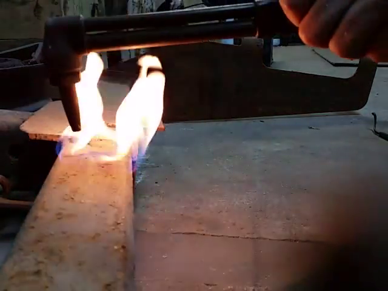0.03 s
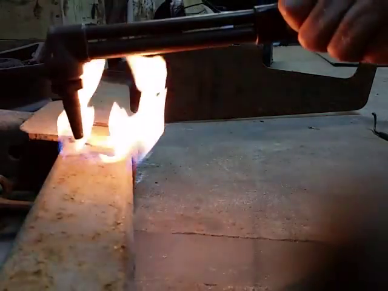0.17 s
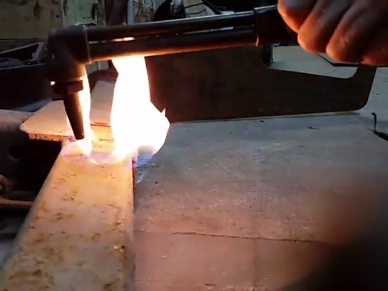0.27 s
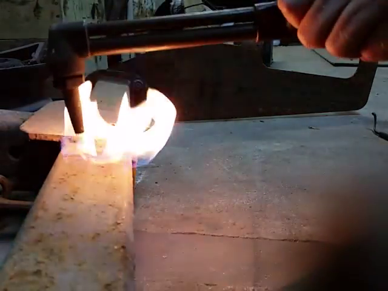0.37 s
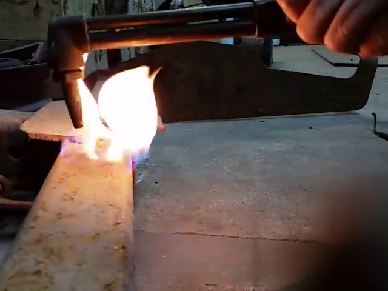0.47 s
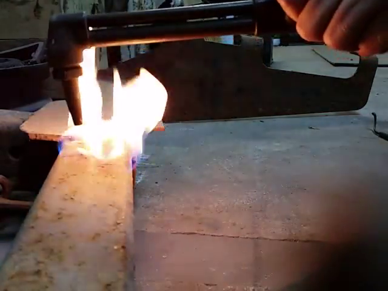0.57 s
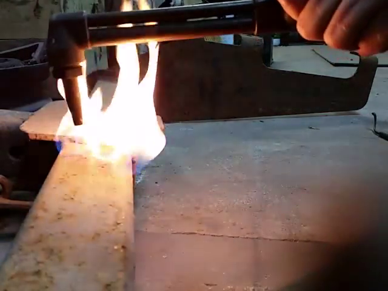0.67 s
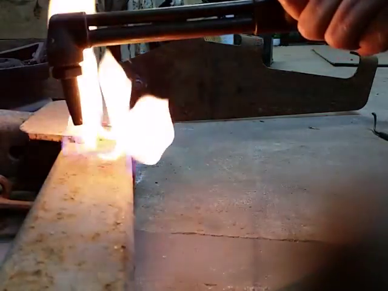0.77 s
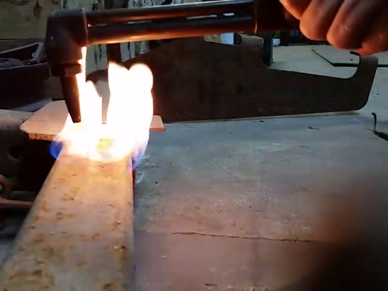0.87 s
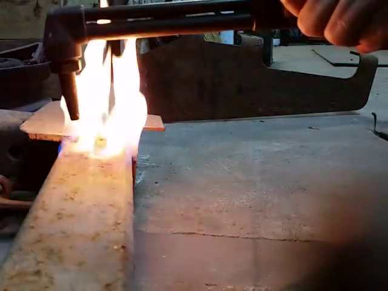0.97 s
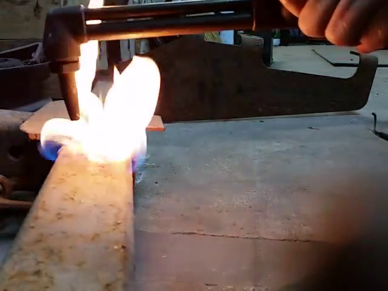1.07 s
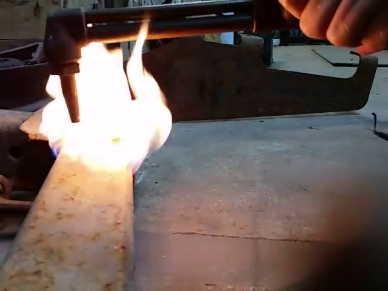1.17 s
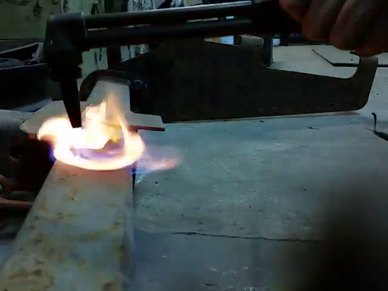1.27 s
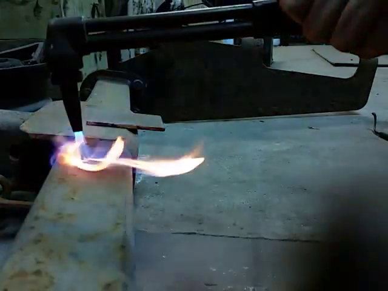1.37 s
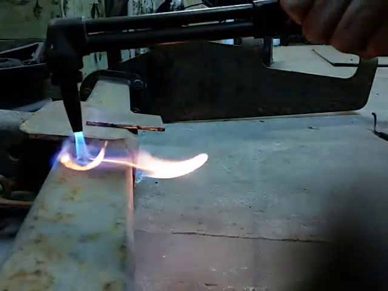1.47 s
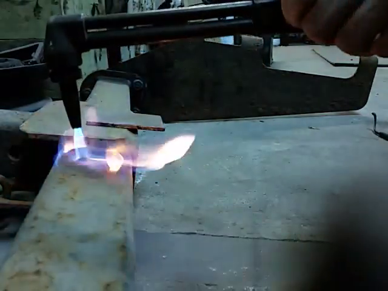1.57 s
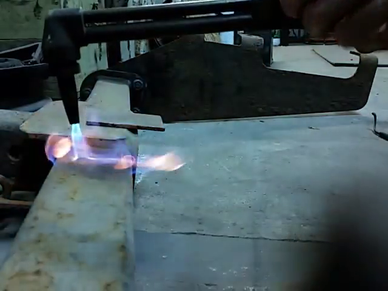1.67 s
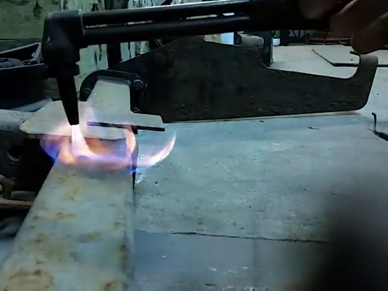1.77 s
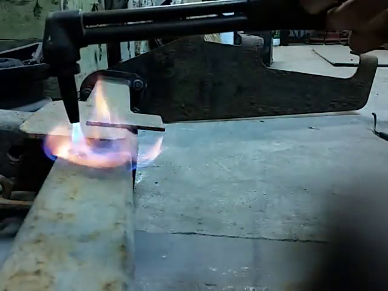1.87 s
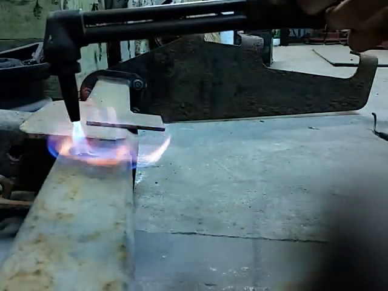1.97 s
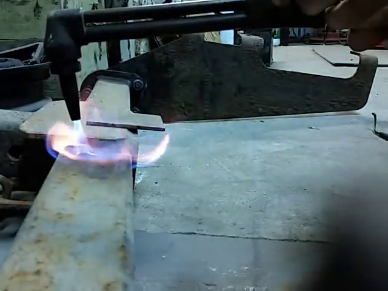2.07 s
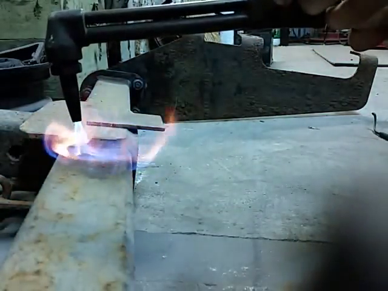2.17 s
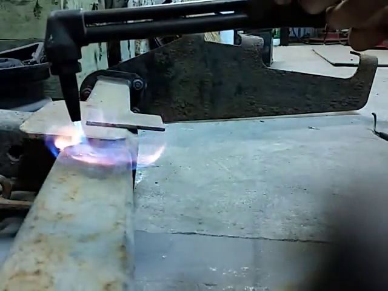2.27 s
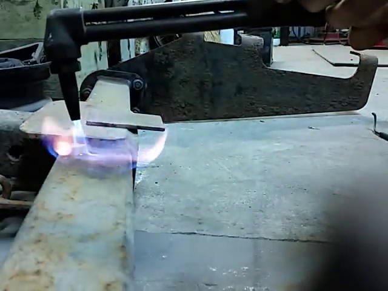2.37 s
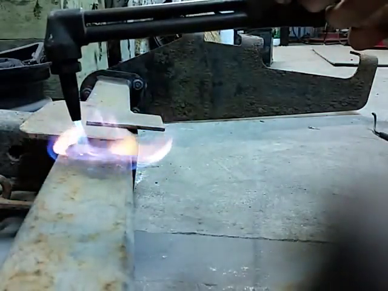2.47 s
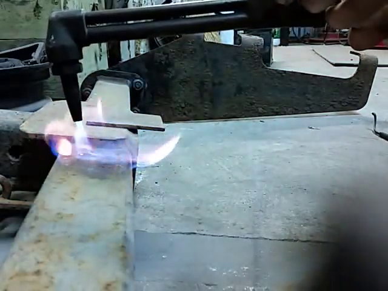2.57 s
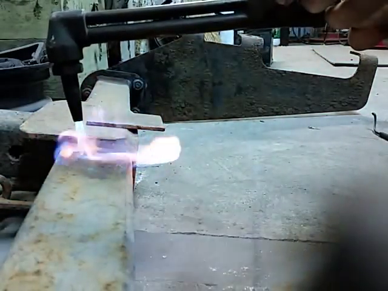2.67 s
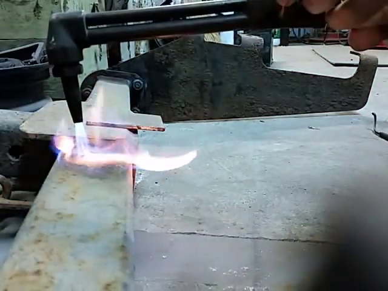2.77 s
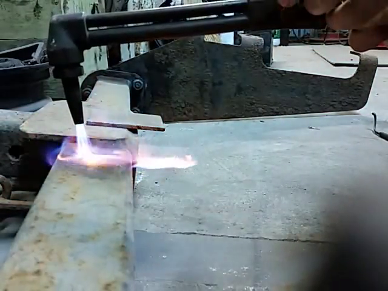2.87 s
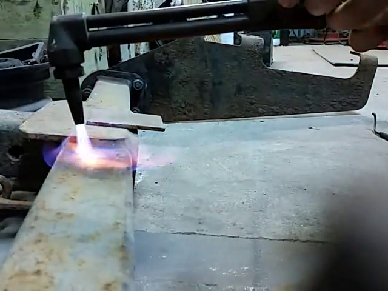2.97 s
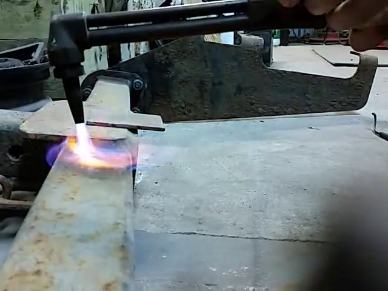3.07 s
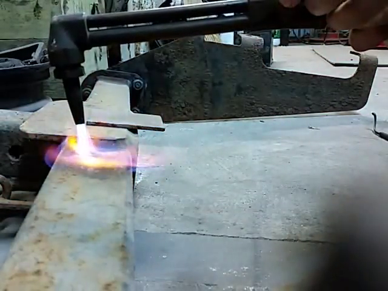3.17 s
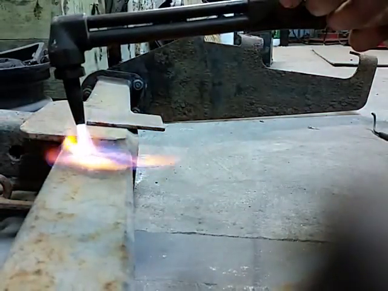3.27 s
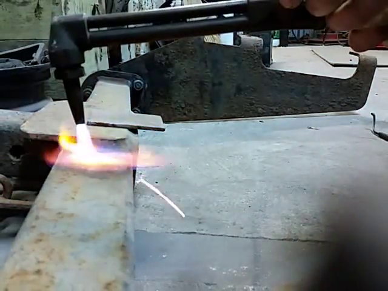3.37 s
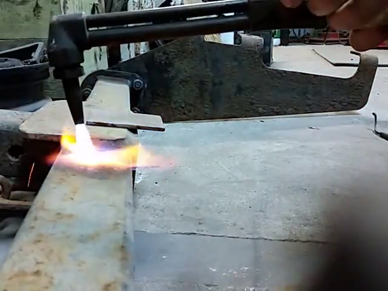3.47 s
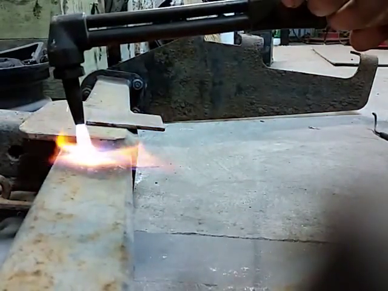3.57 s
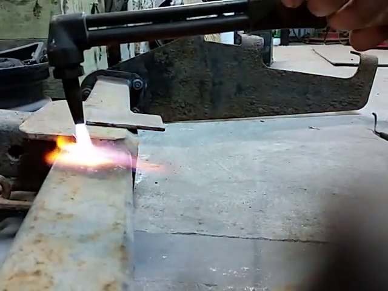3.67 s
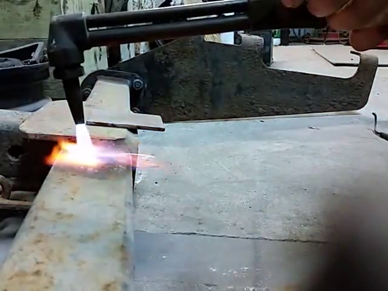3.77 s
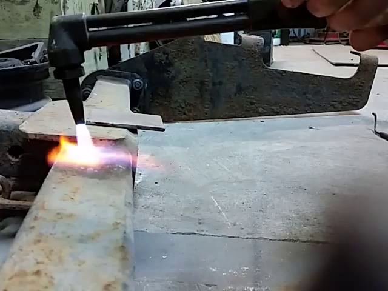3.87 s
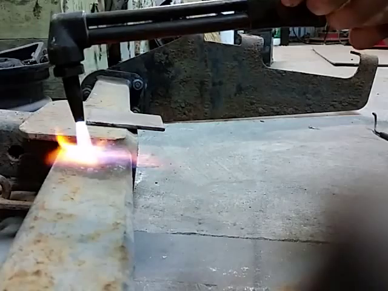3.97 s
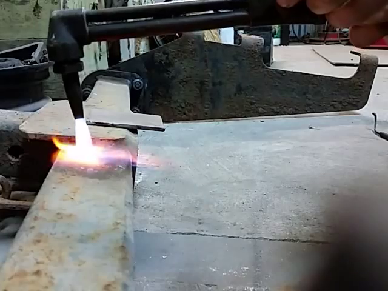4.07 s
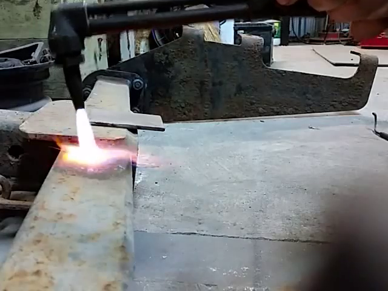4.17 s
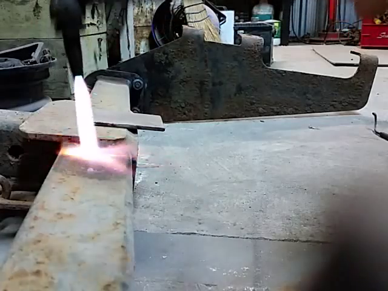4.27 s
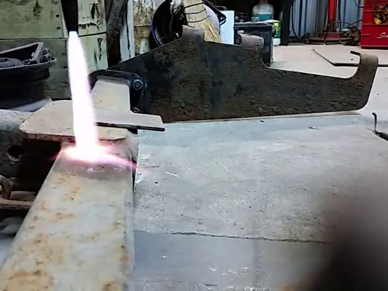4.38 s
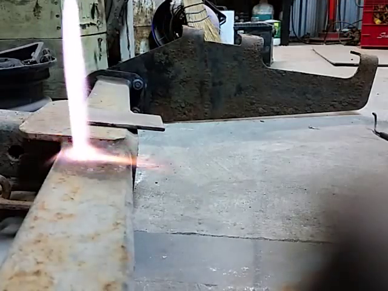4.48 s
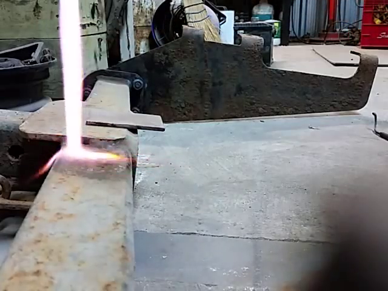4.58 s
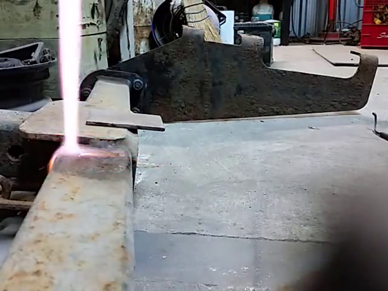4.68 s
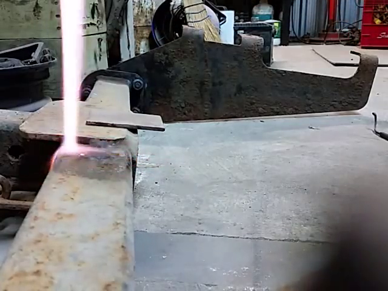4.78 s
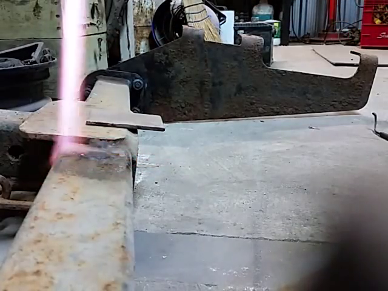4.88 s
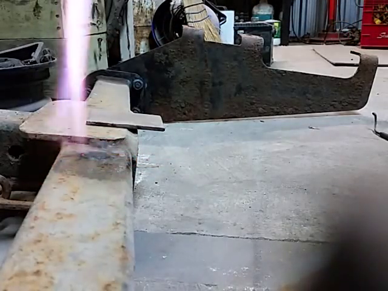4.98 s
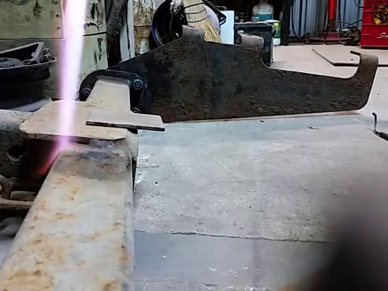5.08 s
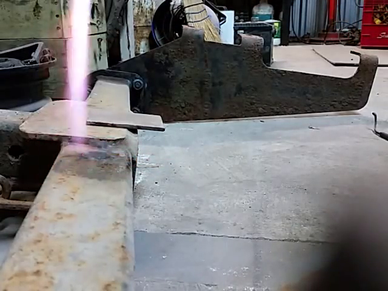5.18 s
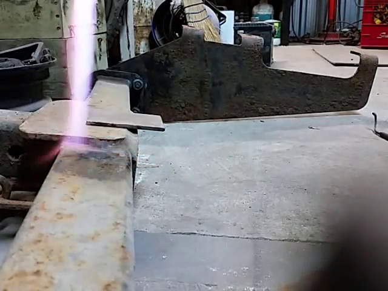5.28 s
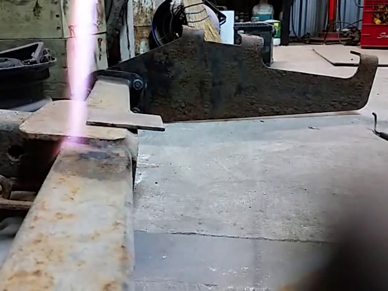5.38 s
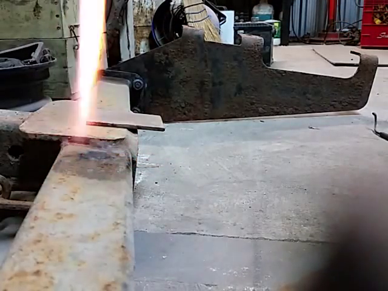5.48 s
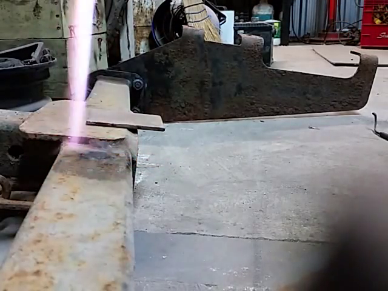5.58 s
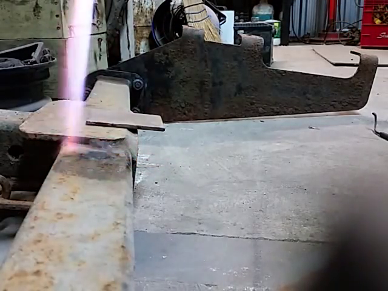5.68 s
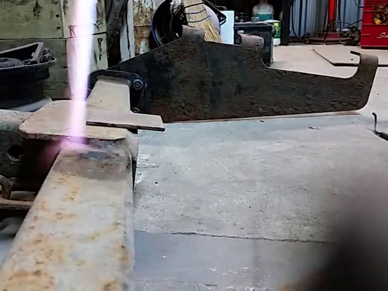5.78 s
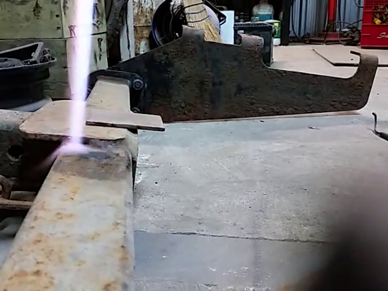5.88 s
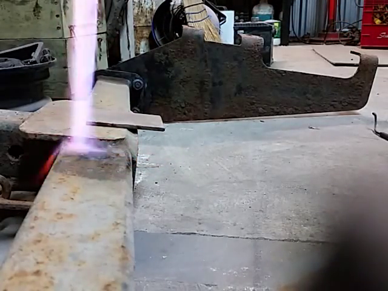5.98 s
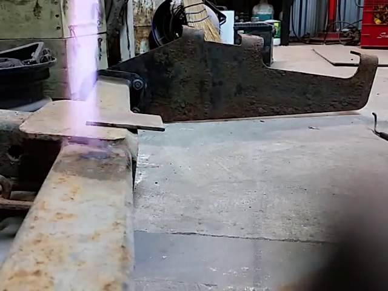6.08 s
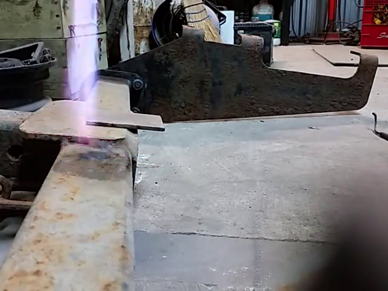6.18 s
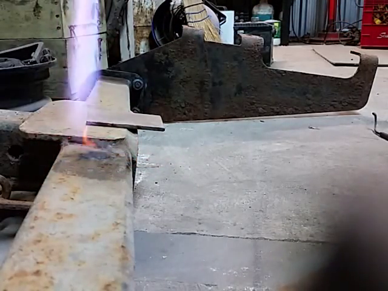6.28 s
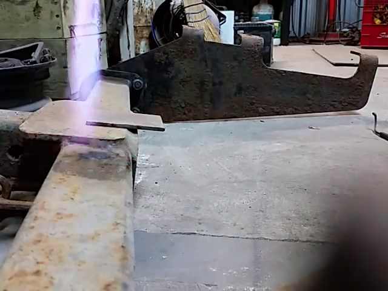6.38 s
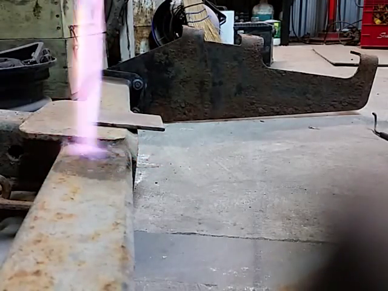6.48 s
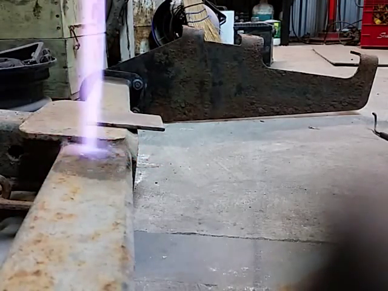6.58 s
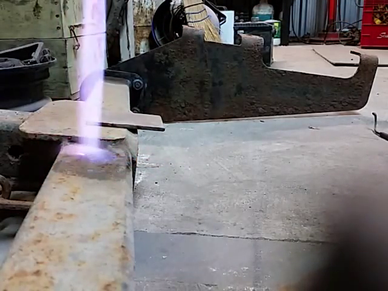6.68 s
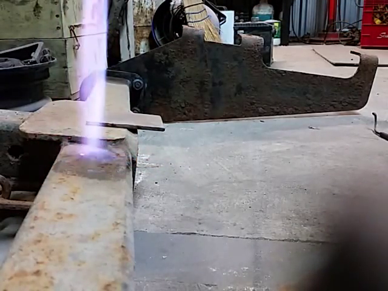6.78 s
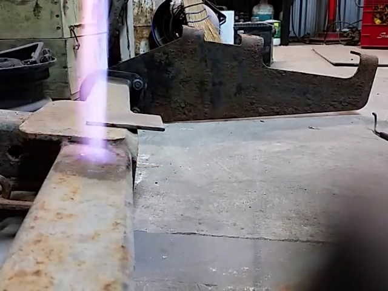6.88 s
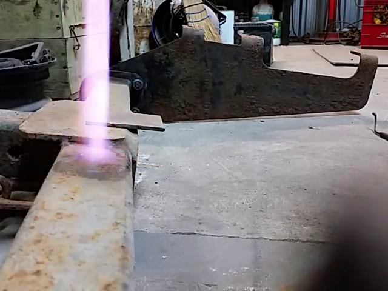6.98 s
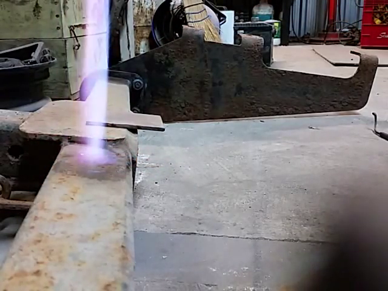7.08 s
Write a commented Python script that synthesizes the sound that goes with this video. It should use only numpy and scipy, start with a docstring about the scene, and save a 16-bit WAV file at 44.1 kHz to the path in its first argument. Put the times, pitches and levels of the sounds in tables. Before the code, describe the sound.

A gas torch burns lazily, flares with a rough buzz, tears and spits, snaps alight and becomes a loud bright hiss, then a puffing roar.

```python
"""An oxy-fuel cutting torch over a steel bar on a workshop bench, heard close by at two microphone ports.
Ragged bursts of shaped noise are the unseated fuel flame, which flares with a buzz, tears, spits and seats.
Bright noise then forms the oxygen jet, combed by its bounce off the steel; smoother noise is the inner cones.
Low noise swells and single pressure swings make the free flame roar and puff.
Rumble and a few wavering sines of mains and motor hum lie underneath."""
import sys
import numpy as np
from scipy import signal
from scipy.fft import rfft, irfft, next_fast_len
from scipy.io import wavfile
from scipy.ndimage import uniform_filter1d, map_coordinates

SR = 44100
rng = np.random.default_rng(int(sys.argv[2]) if len(sys.argv) > 2 else 0)


def transcribe(u):
    """Save the signal u as a 16-bit wav file named by the first command-line argument.

    u: samples, shape (n,) or (channels, n), limited to [-1, 1]; the rate is SR.
    q: integer samples, one column per channel.
    """
    v = np.clip(np.atleast_2d(u).T, -1, 1)
    q = np.round(v * 32767).astype(np.int16)
    wavfile.write(sys.argv[1], SR, q)


N = 314433
T = np.arange(N) / SR  # time [s]

# spitting while the flame seats: (start [s], end [s], level at the start [dB], level at the end [dB])
SPIT = (2.818, 2.926, -53, -47)
# oxygen jet of the seated flame: (time [s], hiss level ahead of the layer gain [dB], aim left over right [dB])
OXYGEN = [(2.99, -54, 9.0), (3.31, -44, 9.0), (3.37, -34, 8.5), (3.55, -32, 9.5), (3.58, -27, 12.0),
          (3.76, -24.8, 8.5), (3.83, -24, 11.5), (3.91, -24, 5.5), (3.98, -24, 10.5), (4.05, -24.5, 5.0),
          (4.15, -24, 9.5), (4.29, -24, 10.0), (4.42, -31, 0.5), (4.47, -26, 6.5), (4.6, -27, 3.0),
          (4.68, -31, 5.5), (4.8, -27, 2.5), (4.89, -25.5, 5.0), (4.94, -24.5, 10.0), (5.0, -24, 5.0),
          (5.08, -27, 7.0), (5.16, -29.3, 4.0), (5.46, -27.5, 1.5), (5.6, -27, 7), (5.81, -27.5, 2.0),
          (5.88, -33, 1.5), (5.97, -27, 3.5), (6.0, -29, 6.0), (6.11, -40, 1.0), (6.29, -40, 4.0),
          (6.52, -45, 0.0), (6.7, -36, 2.0), (6.82, -39.5, -11), (6.9, -38, -8), (7.0, -37, 0.0),
          (7.06, -42, -3.5), (7.12, -43, -1.0)]
SEAT_S = 2.965  # the flame snaps onto the tip
FLARE_CUT_S, TEAR_S = 1.478, 1.649  # the first flare ends, the ragged tearing begins
OPENING_START_S, OPENING_END_S = 2.78, 4.3  # the rush opens up and the bench ripple fades


def undb(db):
    """Amplitude ratio: 20 dB is a factor of ten."""
    return 10 ** (np.asarray(db) / 20)


def curves(rows):
    """Linear interpolation: each column after the time becomes a control signal."""
    times, *columns = np.transpose(rows)
    return [np.interp(T, times, column) for column in columns]


def colour(x, points):
    """Zero-phase filtering: scales the spectrum by a curve of (frequency [Hz], gain [dB]) on a log axis."""
    hz, db = np.transpose(points)
    size = next_fast_len(N)
    bins = np.maximum(np.arange(size // 2 + 1) * SR / size, 1)
    gain = undb(np.interp(np.log(bins), np.log(hz), db))
    return irfft(rfft(x, size) * gain, size)[..., :N]


def unit(x):
    """Power normalisation: scales to an rms of 1."""
    return x / np.sqrt(np.mean(x ** 2))


def walk(rate):
    """Band-limited fluctuation: smooth chance changing about `rate` times a second, with an rms of 1."""
    step = max(int(SR / rate), 1)
    held = np.repeat(rng.standard_normal(N // step + 1), step)
    return unit(uniform_filter1d(held, step)[:N])


def eddies(rate, depth_db):
    """Turbulence: passing eddies modulate the level of broadband noise."""
    return unit(rng.standard_normal(N) * undb(depth_db * walk(rate)))


def crackle(rate, spread_db):
    """Random ignition: gas pockets fire as impulses at chance moments, a few much larger than the rest."""
    size_db = spread_db * np.minimum(rng.exponential(size=N), 5)
    pulses = undb(size_db) * rng.choice([-1, 1], N)
    return unit(pulses * (rng.random(N) < rate / SR))


def hold(start, end, attack, release):
    """Relaxation envelope: exponential attack up to start, hold until end, exponential release [s]."""
    return np.exp(np.minimum(T - start, 0) / attack - np.maximum(T - end, 0) / release)


def delay(x, ms):
    """Propagation delay: a moving lag, read between samples by cubic interpolation."""
    return map_coordinates(x, [np.arange(N) - ms * SR / 1000], order=3)


def scatter(pair, room_db, t60):
    """Diffuse reverberation: bench and walls return an independent decaying tail to each port."""
    t = T[:SR // 3]
    tail = rng.standard_normal((2, len(t))) * undb(-60 * t / t60) * (t > .001)
    tail /= np.sqrt(np.sum(tail ** 2, axis=1, keepdims=True))
    room = signal.fftconvolve(pair, tail, axes=1)[:, :N]
    return (pair + undb(room_db) * room) / np.hypot(1, undb(room_db))


def place(x, lag_ms, room_db, t60):
    """Arrival-time difference: the left port hears the sound first, the right port later, with room tails."""
    return scatter(np.array([x, delay(x, lag_ms)]), room_db, t60)


def seated():
    """Flame attachment: the share on the tip grows from 0 to 1 over 0.3 s and is full at the seating."""
    return np.clip(1 + (T - SEAT_S) / .3, 0, 1)


def workshop():
    """Background noise and tonal hum: rumble and wavering sines, both rising from 1 to 2.5 s."""
    # rumble spectrum: (frequency [Hz], relative level [dB])
    rumble_spectrum = [(20, -17), (40, -5), (55, 0.5), (75, -2), (105, -3.5), (155, -10.5), (210, -11.5),
                       (300, -16.5), (390, -14), (520, -22.5), (700, -25), (1000, -33), (3000, -66),
                       (8000, -92)]
    # hum of mains and motor, ahead of the rise: (frequency [Hz], level [dB])
    hum_tones = [(54, -66.5), (101, -66), (120, -64), (180, -82), (241, -68)]
    hum = np.zeros(N)
    for hz, db in hum_tones:
        hum += undb(db + .5 * walk(5)) * np.sin(2 * np.pi * hz * T + .1 * walk(3))
    rumble = unit(colour(rng.standard_normal(N), rumble_spectrum))
    rumble_db = np.interp(T, [1, 2.5], [-63.5, -56.5])
    hum_rise_db = np.interp(T, [1, 2.5], [-5, 4.5])
    return rumble * undb(rumble_db) + hum * undb(hum_rise_db)


def puffs():
    """Monopole pulse: a plume pocket collapses and flares again, swinging the pressure down and then up."""
    # puffs of the free flame: (time [s], peak level [dB])
    puff_times = [(4.894, -42), (5.365, -34), (5.453, -39), (5.587, -35), (5.728, -32), (5.945, -38),
                  (5.968, -37), (6.073, -32), (6.128, -34), (6.185, -29), (6.296, -34), (6.392, -33),
                  (6.512, -32), (6.658, -33), (6.693, -33), (6.872, -33), (6.994, -29), (7.033, -33),
                  (7.072, -30)]
    width_s = .0013  # from the centre to either peak
    pressure = np.zeros(N)
    for time, db in puff_times:
        age = (T - time) / width_s
        pressure += undb(db) * age * np.exp((1 - age ** 2) / 2)
    return pressure


def plume_roar():
    """Combustion roar: low turbulent burning noise billows in swells and single gusts."""
    # roar spectrum: (frequency [Hz], relative level [dB])
    roar_spectrum = [(25, -29), (55, -1.5), (90, 3.5), (180, 1), (280, -5.5), (420, -11.5), (620, -22.5),
                     (900, -34), (2000, -68)]
    # swells at the first flare and of the long free flame: (start [s], end [s], level [dB])
    swell_times = [(1.3, 1.357, -46.5), (4.45, 4.744, -53.5), (5, 5.164, -46.5), (5.194, 5.446, -46),
                   (5.62, 5.91, -46.5), (6.098, 6.12, -41.5), (6.254, 6.465, -38.5), (6.507, 6.722, -39.5),
                   (6.89, 7.123, -43.5)]
    # gusts that buffet the plume: (time [s], level [dB])
    gust_times = [(1.13, -57), (1.222, -53), (1.475, -48), (5.275, -39), (5.315, -42), (5.738, -39),
                  (6.21, -39), (6.52, -38), (6.87, -40)]
    rest_db, gust_width_s = -82, .016
    swells = [undb(db) * hold(start, end, attack=.048, release=.066) for start, end, db in swell_times]
    gusts = [undb(db) * np.exp(-((T - time) / gust_width_s) ** 2 / 2) for time, db in gust_times]
    strongest = np.max(swells + gusts, axis=0)
    billows = eddies(rate=80, depth_db=1.5) + .7 * crackle(rate=170, spread_db=1)
    return unit(colour(billows, roar_spectrum)) * (undb(rest_db) * seated() + strongest)


def cone_rush():
    """Turbulent premixed burning: the inner cones rush smoothly, smothered at first, then opening up."""
    # level ahead of the layer gain: (time [s], level [dB])
    cone_levels = [(2.99, -67), (3.3, -63), (3.55, -60), (4.3, -60.5), (4.5, -57.5), (5.35, -63.5),
                   (6.2, -58.5), (7.12, -56)]
    # open rush: (frequency [Hz], relative level [dB])
    rush_spectrum = [(400, -11.5), (950, -5), (1400, 0), (2000, 1.5), (3000, 7), (4800, 6.5), (6500, -8),
                     (12000, -28)]
    # what is left of it while the cones press on the steel: (frequency [Hz], gain [dB])
    smothered = [(900, -12), (2100, 5.5), (3200, -10.5), (4800, -17), (8000, 12)]
    linger_db, gain_db = -77.5, 9  # faint rush between flare and tearing, ahead of the gain; layer gain
    rush_db, = curves(cone_levels)
    rush = unit(colour(eddies(rate=60, depth_db=2.0), rush_spectrum))
    opened = np.interp(T, [OPENING_START_S, OPENING_END_S], [0, 1])
    rush = opened * rush + (1 - opened) * colour(rush, smothered)
    lingering = undb(linger_db) * hold(FLARE_CUT_S, TEAR_S, attack=.03, release=.03)
    return rush * (undb(rush_db) * seated() + lingering) * undb(gain_db)


def gas_flow():
    """Flow control: burning and hiss levels [dB] of a lazy flame, a flare, ragged tearing, then oxygen."""
    # faint hiss of the lazy flame sags and recovers: (time [s], hiss level [dB])
    lazy_hiss = [(0, -72.5), (.7, -85), (1.05, -75.5), (1.585, -89), (1.61, -63), (1.645, -63)]
    # the flame tears off the tip and falls back: (start [s], end [s], burning level [dB], hiss level [dB])
    first_flare = (1.36, 1.375, -43, -36.5)
    # ragged burning off the tip: (time [s], burning level [dB], hiss level [dB])
    ragged_tearing = [(1.66, -54, -50.5), (1.714, -47, -39.5), (1.95, -43, -43.5), (1.98, -39.5, -42),
                      (2.082, -41, -38.5), (2.114, -37.5, -39), (2.14, -42.5, -42.5), (2.408, -37, -37.5),
                      (2.512, -45.5, -41.5), (2.568, -36, -36), (2.642, -39, -39.5), (2.672, -46, -45.5),
                      (2.744, -36.5, -39), (2.806, -52.5, -53)]
    lazy_db = -76
    start, end, flare_db, flare_hiss_db = first_flare
    at_seating = (SEAT_S, -51, -47)
    tear_db, tear_hiss_db = curves([*ragged_tearing, at_seating])
    flaring = hold(start, end, attack=.04, release=.12)
    flaring = flaring * hold(0, FLARE_CUT_S, attack=.04, release=.022)
    flare_hissing = hold(1.395, 1.425, attack=.075, release=.028)
    tearing = hold(TEAR_S, T[-1], attack=.007, release=1)
    burn = undb(lazy_db) + undb(flare_db) * flaring + undb(tear_db) * tearing
    lazy_hiss_db, = curves(lazy_hiss)
    fuel = undb(lazy_hiss_db) + undb(flare_hiss_db) * flare_hissing + undb(tear_hiss_db) * tearing
    oxygen_db, _ = curves(OXYGEN)
    return 20 * np.log10(burn), np.where(T < SEAT_S, 20 * np.log10(fuel), oxygen_db)


def flare(burn_db):
    """Periodic flame detachment: the front hops on and off the tip in a rough buzz of rising pitch."""
    start_s, end_s = 1.29, 1.49
    start_hz, rise_hz_per_s = 171, 215
    hz = start_hz + rise_hz_per_s * (np.clip(T, start_s, end_s) - start_s)
    phase = 2 * np.pi * np.cumsum(hz * (1 + .0764 * walk(120))) / SR
    # fundamental and octave, relative to the burning level
    buzz = undb(-1) * np.sin(phase) + undb(-4) * np.sin(2 * phase)
    return buzz * undb(burn_db + 2 * walk(90)) * hold(start_s, end_s, attack=.015, release=.008)


def flutter(burn_db):
    """Unsteady combustion: the unseated flame burns in ragged bursts and loses its body as it spits."""
    # full burning: (frequency [Hz], relative level [dB])
    ragged_spectrum = [(40, -16), (100, 1.5), (190, 6.5), (290, 0.5), (410, 6), (600, 0), (780, 2),
                       (880, -8), (1020, -6.5), (1800, -2.5), (2150, -6), (2650, -7), (3000, -12.5),
                       (5000, -24.5), (9000, -43)]
    # what is left once the flame shrinks towards the tip: (frequency [Hz], gain [dB])
    shrunk = [(150, -8), (300, -7), (600, -1.5), (2000, 2.5)]
    spit_start, spit_end, _, _ = SPIT
    bursts = eddies(rate=130, depth_db=2.5) + .6 * crackle(rate=1400, spread_db=2.1)
    torn = np.interp(T, [.9, 1.25], [.45, 1]) * hold(0, spit_end, attack=.01, release=.024)
    ragged = unit(colour(bursts, ragged_spectrum))
    body = hold(0, spit_start, attack=.01, release=.01)
    burning = body * ragged + (1 - body) * colour(ragged, shrunk)
    return burning * undb(burn_db) * torn


def seating():
    """Impulsive ignition: dense spitting, sharp pops at the tip, and a small thud as the flame snaps on."""
    # pops at the tip: (time [s], level [dB])
    pops = [(1.605, -60), (1.649, -55), (1.685, -49), (1.711, -44), (2.902, -44), (2.916, -42),
            (2.922, -43), (2.964, -47)]
    # spits and pops: (frequency [Hz], gain [dB])
    sizzle_spectrum = [(300, -12), (1000, 1), (2500, 0), (4000, -3), (7000, -3.5), (9500, 0), (16000, 0)]
    # thud: (frequency [Hz], relative level [dB])
    thud_spectrum = [(60, 10), (200, 11), (600, -2), (1000, -9), (3000, -30)]
    thud_db = -39.5
    start, end, start_db, end_db = SPIT
    gate = uniform_filter1d(1. * (T > start) * (T < end), size=150)
    spit_db = np.interp(T, [start, end], [start_db, end_db])
    spit = crackle(rate=20000, spread_db=2.5) * gate * undb(spit_db)
    cracks = sum(undb(db) * np.exp(-np.abs(T - time) / .0008) for time, db in pops)
    thud = unit(colour(rng.standard_normal(N), thud_spectrum))
    thud = thud * undb(thud_db) * np.exp(-np.abs(T - SEAT_S) / .0035)
    return colour(spit + cracks * rng.standard_normal(N), sizzle_spectrum) + thud


def waver(gas):
    """Band-wise modulation: broad bands of the hiss swell and sink on their own, differently at each port."""
    for hz in [5000, 8200, 11800, 14600]:
        bell = [(hz / 1.4, -40), (hz / 1.1, -3), (hz, 0), (hz * 1.1, -3), (hz * 1.4, -40)]
        band = colour(gas, bell)
        swell_db = 1.1 * np.array([walk(11), walk(11)])
        gas = gas + band * (undb(swell_db) - 1)
    return gas


def jet(hiss_db, lag_ms, bounce_ms, bounce):
    """Jet noise and comb filtering: faster gas hisses brighter; its bounce off the steel moves a comb."""
    # full jet: (frequency [Hz], relative level [dB])
    jet_spectrum = [(800, -26), (2000, -32), (3000, -24.5), (4200, -8.5), (5300, 2), (6600, 2), (8000, 4),
                    (10000, 1.5), (16000, 2)]
    # slow jet: (frequency [Hz], gain [dB])
    weak_jet = [(6000, -50), (8500, -15), (10200, 2.5), (11500, -14), (13000, -6), (16000, -10)]
    # changed treble once the jet eases: (frequency [Hz], gain [dB])
    eased_jet = [(7000, 3.5), (8500, 2), (12000, 1.5), (14000, -1.5)]
    # the steel throws back the finest hiss: (frequency [Hz], gain [dB])
    glint = [(5500, 1), (10000, -2), (13000, 4), (16000, 4)]
    gain_db, right_bounce = -15, .19  # layer gain; bounce at the right port relative to the left
    full_speed_db, brighten = -35, .46  # hiss level of a fully bright jet; how fast it gets there
    core, left, right = rng.standard_normal((3, N))
    # the jet is many wavelengths long, so the ports share only part of its sound
    shared = np.array([core, delay(core, lag_ms)])
    gas = colour(shared + undb(-1.0) * np.array([left, right]), jet_spectrum)
    # a faster jet sheds finer eddies and sounds brighter
    speed = np.minimum(undb(brighten * (hiss_db - full_speed_db)), 1)
    gas = unit(speed * gas + (1 - speed) * colour(gas, weak_jet))
    eased = np.interp(T, [6, 6.15], [0, 1])
    gas = (1 - eased) * gas + eased * colour(gas, eased_jet)
    gas = waver(gas)
    unsteady = 1 - seated()
    flicker_db = (.7 + .5 * unsteady) * walk(400)
    flicker_db += (.45 + .6 * unsteady) * walk(45)
    flicker_db += (.3 + .7 * unsteady) * walk(14)
    hiss = gas * undb(hiss_db + gain_db + flicker_db)
    ports = []
    for direct, share in zip(hiss, [bounce, right_bounce * bounce]):
        reflected = colour(delay(direct, bounce_ms), glint)
        ports.append((direct - share * reflected) / np.hypot(1, share))
    return np.array(ports)


def bench_echo(hiss, bounce_ms):
    """Early reflection: the bench top adds a ripple that shifts with the hand and fades as the flame settles."""
    ms = 1.05 + bounce_ms + .012 * walk(3.03)  # the last term is the trembling hand
    share = np.interp(T, [OPENING_START_S, OPENING_END_S], [.26, .15])
    return np.array([direct + share * delay(direct, ms) for direct in hiss]) / np.hypot(1, share)


def beam():
    """Directivity: the narrow hiss beam swings between the ports at constant summed power."""
    fuel_pan_db, left_lead_db = 12.5, 8  # aim of the unseated jet; what the sharper left port adds
    _, aim_db = curves(OXYGEN)
    pan_db = fuel_pan_db + seated() * (aim_db - fuel_pan_db) + 1.2 * walk(10)
    swing = undb(pan_db - left_lead_db)  # the port's own lead completes the aim
    power_match = np.hypot(undb(left_lead_db), 1) / np.hypot(undb(pan_db), 1)
    return np.array([swing, np.ones(N)]) * power_match


def scene():
    """Superposition: every part of the flame leaves the tip; gas flow drives both its burning and hiss."""
    # torch position: (time [s], lag of the right port [ms], delay of the bounce off the steel [ms],
    # share of that bounce [ratio])
    torch_pose = [(0, .168, .05, 0), (2.9, .168, .05, 0), (3.4, .19, .05, 0), (4.3, .185, .06, 0),
                  (4.44, .17, .125, .45), (4.51, .155, .162, .8), (4.6, .14, .194, .75),
                  (4.7, .125, .23, .45), (4.8, .115, .25, .05), (6.1, .125, .17, 0), (6.5, .13, .145, .25),
                  (6.7, .13, .1, .05), (6.82, .13, .072, .3), (7.13, .13, .065, .1)]
    burn_db, hiss_db = gas_flow()
    lag_ms, bounce_ms, bounce = curves(torch_pose)
    rush = cone_rush()
    roar = plume_roar()
    hiss = bench_echo(jet(hiss_db, lag_ms, bounce_ms, bounce), bounce_ms)
    hiss = scatter(hiss, room_db=-8, t60=.08)
    spits = place(seating(), lag_ms, room_db=-12, t60=.04)
    burning = place(flutter(burn_db) + flare(burn_db) + rush, lag_ms, room_db=-6, t60=.2)
    lows = place(roar + puffs() + workshop(), lag_ms, room_db=-12, t60=.3)
    return (hiss + spits) * beam() + burning + lows


def record(dry):
    """Cavity resonance: each port colours the sound; faint microphone noise and a steep low-pass follow."""
    # left port: (frequency [Hz], gain [dB])
    left_port = [(60, -3), (200, -3.5), (500, -1), (1300, 0), (3200, -1.5), (4000, 2), (4800, .5),
                 (6900, 1.5), (8000, 10), (9000, 19), (9500, 25), (10150, 28.5), (10700, 26), (11400, 22.5),
                 (13000, 18), (15700, 16.5)]
    # right port: (frequency [Hz], gain [dB])
    right_port = [(60, 2), (200, 2), (500, 1), (1300, 0), (4400, 2), (5400, 3.5), (6900, 0), (8400, 4),
                  (9100, 7.5), (10000, 10), (11000, 15.5), (13000, 17.5), (14500, 15), (15700, 13.5)]
    noise_db, top_hz = -91, 15800
    heard = np.array([colour(dry[0], left_port), colour(dry[1], right_port)])
    heard = heard + undb(noise_db) * rng.standard_normal((2, N))
    low_pass = signal.ellip(12, .2, 80, top_hz, fs=SR, output="sos")
    return signal.sosfilt(low_pass, heard)


dry = scene()
out = record(dry)
transcribe(out)
```